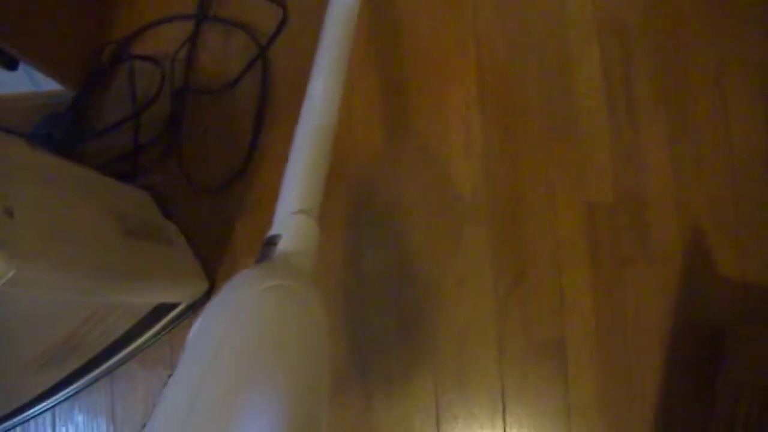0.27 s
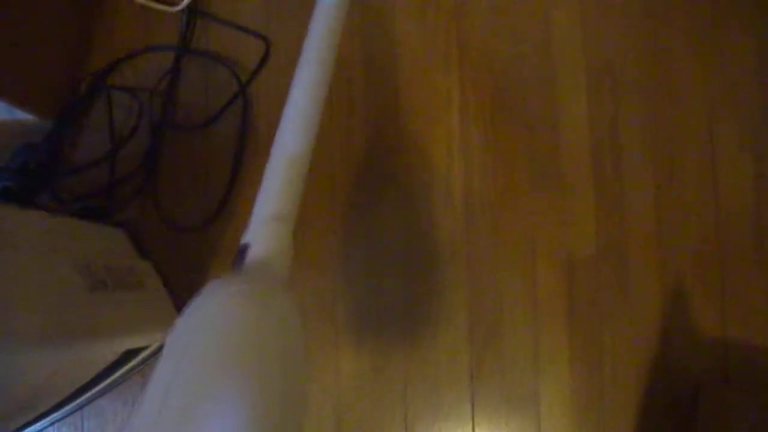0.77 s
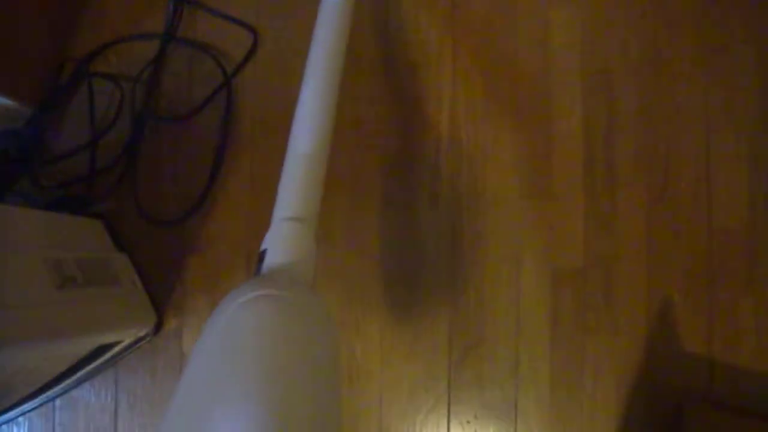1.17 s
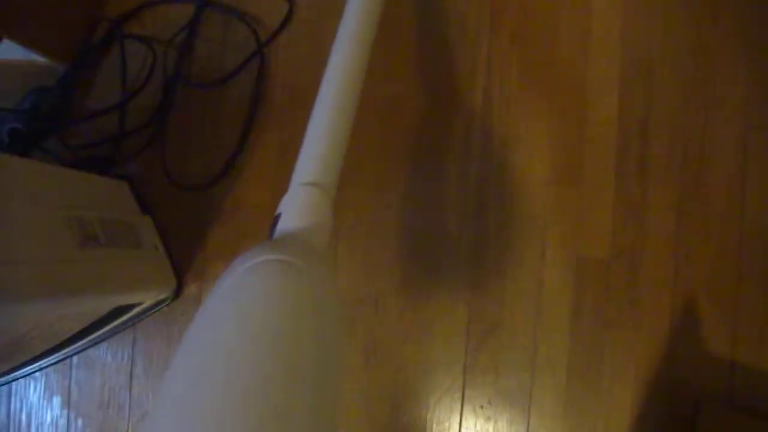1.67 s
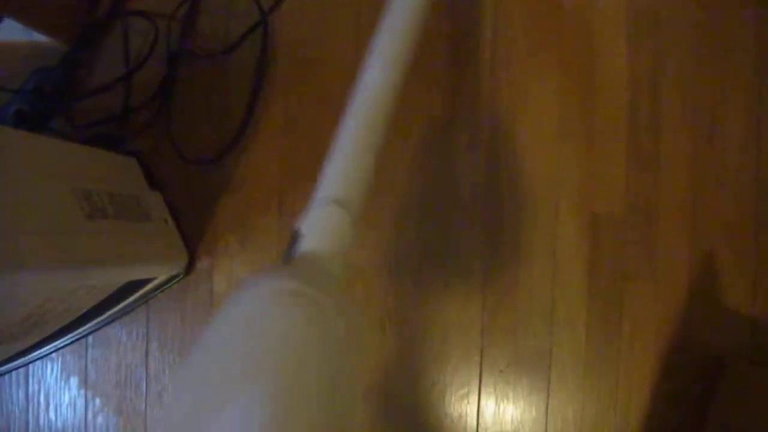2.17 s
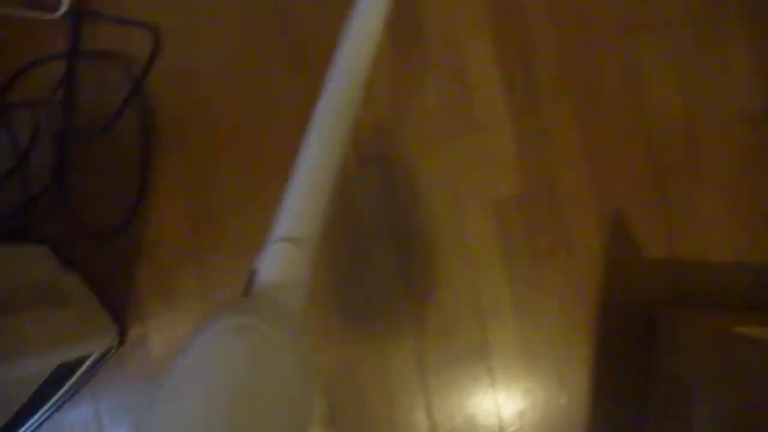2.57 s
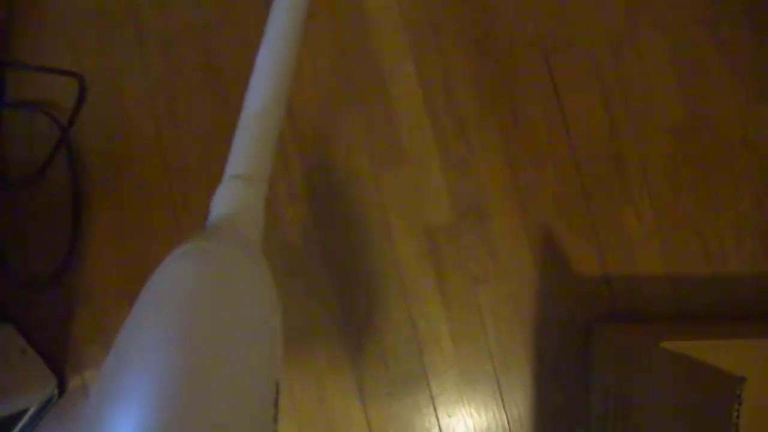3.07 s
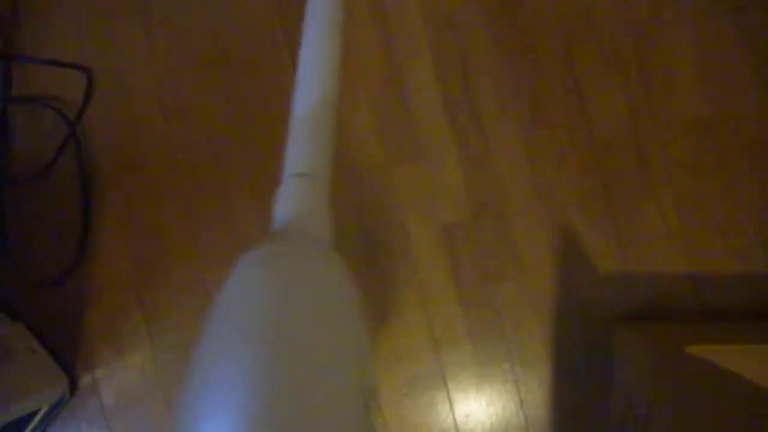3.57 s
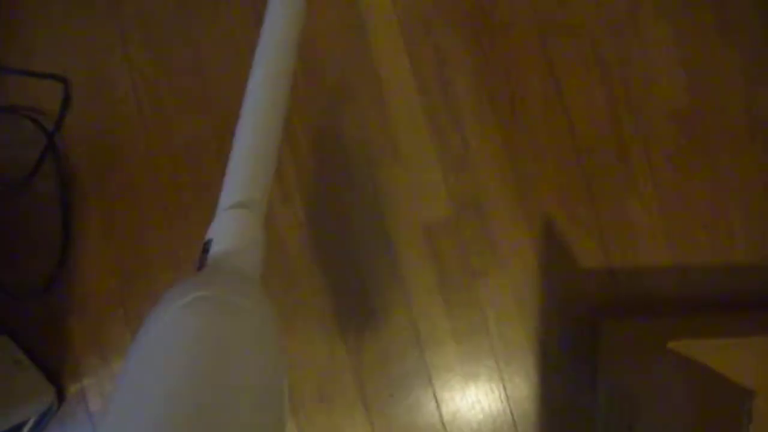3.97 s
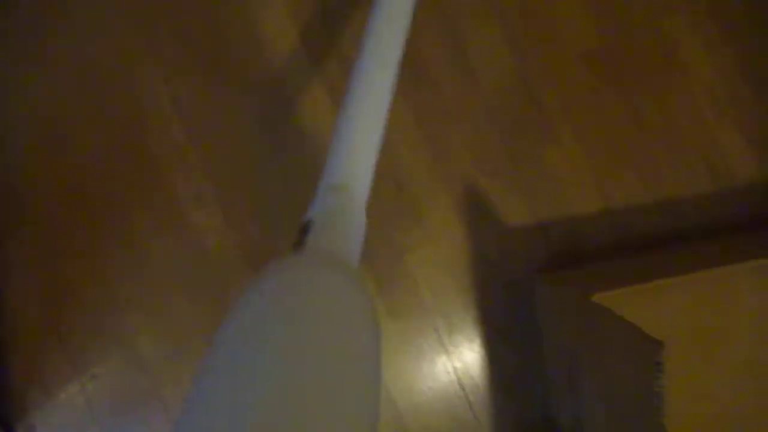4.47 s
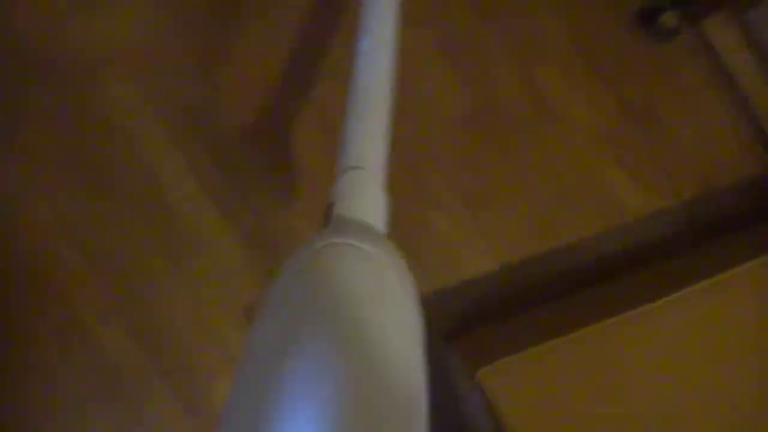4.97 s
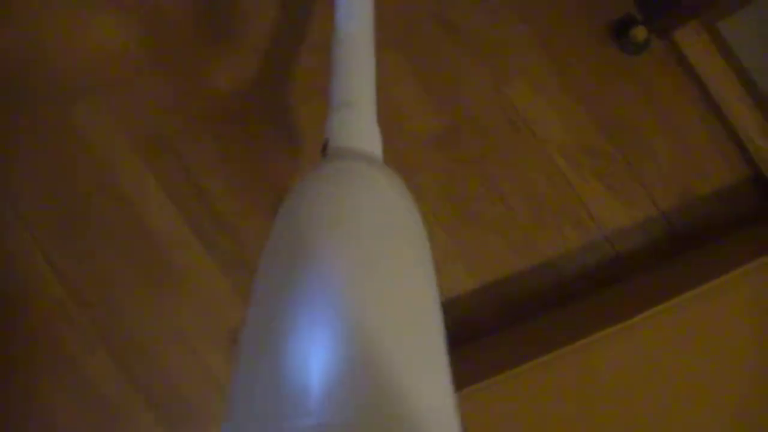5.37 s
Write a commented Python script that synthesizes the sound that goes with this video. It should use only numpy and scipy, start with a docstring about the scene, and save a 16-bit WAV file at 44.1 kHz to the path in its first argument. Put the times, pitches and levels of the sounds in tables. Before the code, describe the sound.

A cordless stick vacuum, close and centred, is heard in a quiet wooden-floored room with short reflections. From 0 s it runs at full speed: low hum near 280 Hz, piercing whine around 2.5 kHz with a fainter octave, and a broad, hollow rush with bright exhaust hiss. A short hollow scrape skims the floor at 0.25-0.5 s. At 1.5 s the trigger is released; pitch and air sink smoothly, leaving a thin bearing sizzle and flickering rotor tones, with plastic knocks and ticks at 2.15-2.55 s. A sharp clack at 2.87 s brings a fast spin-up, this burst carrying an extra bright, half-whistling hiss around 6 kHz. Released at 3.6 s, it glides down again as the hiss opens away by 3.9 s; clacks, a dull bump at 4.17 s, low grip rubbing and a faint pipe-like hoot follow. At 4.85 s it clicks, surges back and runs until about 5.6 s.

```python
"""Cordless stick vacuum in bursts

A stick vacuum, held close over a wooden floor in a quiet room, runs and coasts down; its trigger is pressed again twice.
Shaft speed steers a hum, the whine of a nine-blade impeller (sines) and a rush of air (noise ringing in wand and bin).
In the middle burst the intake is narrowed and hisses: a bright band of noise.
The plastic body clacks, ticks and bumps in the hand: shaped noise under struck envelopes."""
import sys
import numpy as np
from scipy import signal
from scipy.fft import rfft, irfft
from scipy.io import wavfile

SR = 44100
rng = np.random.default_rng(int(sys.argv[2]) if len(sys.argv) > 2 else 0)


def store_wav(level_fs):
    """Save 16-bit WAV to argv[1]."""
    pcm = np.round(np.clip(np.atleast_2d(level_fs), -1, 1) * 32767)
    wavfile.write(sys.argv[1], SR, pcm.T.astype(np.int16))


N = 248283
TIME = np.arange(N) / SR
FREQS = np.maximum(np.fft.rfftfreq(2 ** 18, 1 / SR), 1)  # Hz, kept off zero for logs and ratios


def from_db(db):
    """Decibels to amplitude."""
    return 10 ** (np.asarray(db) / 20)


def rms_one(x):
    """Scale a signal to rms 1."""
    return x / np.sqrt(np.mean(x ** 2) + 1e-20)


def in_time(rows):
    """Each column of a table as a curve over time."""
    s, *columns = np.transpose(rows)
    return [np.interp(TIME, s, column) for column in columns]


def bell(hz, width_hz):
    """Response curve of one resonance, 1 on top."""
    return 1 / (1 + (2 * (FREQS - hz) / width_hz) ** 2)


def filtered(x, response):
    """A signal through a frequency response."""
    padded_length = 2 * (len(FREQS) - 1)
    return irfft(rfft(x, padded_length) * response)[:N]


def noise(response):
    """Noise with a given frequency response; rms 1."""
    return rms_one(filtered(rng.standard_normal(N), response))


def colour(spectrum, resonances=()):
    """A smooth spectrum with resonances standing on it, falling away below its first point."""
    hz, db = np.transpose(spectrum)
    smooth_db = np.interp(np.log(FREQS), np.log(hz), db, left=db[0])
    peaks_db = sum(top_db * bell(f, width_hz) for f, width_hz, top_db in resonances)
    low_rolloff = np.minimum(FREQS / hz[0], 1) ** 2
    return low_rolloff * from_db(smooth_db + peaks_db)


def drift(rate_hz):
    """Slow random wander with spread 1."""
    return noise(1 / (1 + (FREQS / rate_hz) ** 2))


def strike(s, t60):
    """Envelope of a blow: a sudden rise and an exponential fall by 60 dB in t60 seconds."""
    age = np.maximum(TIME - s, 0)
    rise = 1 - np.exp(-age / 0.00042)
    return rise * from_db(-60 * np.minimum(age / t60, 3))


def room(x, wet_db, t60, count=40):
    """Floor, walls and furniture return scattered echoes that ripple the spectrum."""
    delays = rng.uniform(.002, .07, count)  # s
    echoes = np.zeros(N)
    echoes[(delays * SR).astype(int)] = rng.choice([-1, 1], count) * from_db(-60 * delays / t60)
    echoes *= from_db(wet_db) / np.linalg.norm(echoes)
    echoes[0] = 1  # direct sound
    echoes /= np.linalg.norm(echoes)
    return filtered(x, rfft(echoes, 2 * (len(FREQS) - 1)))


def shaft_speed():
    """Turns per second: powered, it closes in on full speed; released, it coasts against friction and air drag."""
    # full speed under power wanders a little with the load: t/s, shaft speed/(turns per s)
    full_speed = [(0.58, 279.5), (1.0, 281.7), (3.4, 281.7), (5.3, 278.8)]
    # the trigger, held at first: t/s, state (1 pressed, 0 released)
    trigger = [(1.492, 0), (2.854, 1), (3.619, 0), (4.851, 1)]
    spin_up_s, friction_s = .127, 2.969  # time constants
    drag_equal_hz = 184.2  # here air drag equals bearing friction
    full, = in_time(full_speed)
    speed = full.copy()
    for s, pressed in trigger:
        i = int(s * SR)
        age, start = TIME[i:] - s, speed[i]
        if pressed:
            speed[i:] = full[i:] + (start - full[i]) * np.exp(-age / spin_up_s)
        else:
            slowing = (1 / start + 1 / drag_equal_hz) * np.exp(age / friction_s)
            speed[i:] = 1 / (slowing - 1 / drag_equal_hz)
    return speed


def at_speed(speed, rated_db, growth_db, rated_hz=280):
    """Level of a sound that grows as a power of shaft speed: growth_db per tenfold speed."""
    return rated_db + growth_db * np.log10(speed / rated_hz)


def motor(speed, rush_db, jitter=0.0005, overtones_db=-2):
    """Imbalance hums once a turn, nine blades whine, and the rotor adds faint harmonics."""
    # the tones swell and fade as the machine moves through the room: t/s, gain/dB
    hum_swell = [(0.08, -6.5), (.36, 3), (.76, 4.5), (.97, -1.5), (1.46, -2), (1.62, -10), (1.98, 3.5),
                 (2.25, -5), (3.05, -3), (3.25, 1.5), (3.6, -3.5), (3.9, 6), (4.6, -3), (5.05, 8),
                 (5.63, 0)]
    whine_swell = [(0, 6), (.2, -0.5), (.5, -5), (.72, 2.5), (1.0, -7), (1.34, 1), (1.56, 1.5), (1.65, 0),
                   (2.9, -5), (3.27, 6.5), (3.39, -7.5), (3.72, 1), (4.95, -2.5), (5.12, 5), (5.2, 1),
                   (5.42, 4), (5.63, -2)]
    octave_swell = [(0, -5), (.32, 8), (.66, -5), (.87, 8), (1.3, -8), (1.56, 1), (1.8, -6), (3.2, 0),
                    (4.9, -1), (5.1, 4), (5.4, -3), (5.63, 9)]
    # weaker shaft harmonics: multiple of shaft speed, relative level/dB
    overtones = [(2, -30), (3, -34), (4, -34), (17, -32), (23, -29), (27, -23), (36, -34), (52, -25),
                 (54, -26), (63, -21), (72, -21)]
    blade_count = 9
    # the housing muffles the whine below an edge
    edge_hz, edge_width_hz, muffle_db = 2054, 72, 7.5
    muffled = .5 + .5 * np.tanh((edge_hz - blade_count * speed) / edge_width_hz)
    hum_db = at_speed(speed, -44.5, 71) + in_time(hum_swell)[0]
    whine_db = at_speed(speed, -33, 61) + in_time(whine_swell)[0] - muffle_db * muffled
    octave_db = at_speed(speed, -41.5, 93) + in_time(octave_swell)[0]
    turn = 2 * np.pi * np.cumsum(speed * (1 + jitter * drift(29))) / SR
    blades = blade_count * turn
    # while the speed changes the whine flickers more, like a tone beating against its own echoes
    gliding = np.minimum(np.abs(np.gradient(speed)) * SR / 150, 1)
    hum = from_db(hum_db + drift(5.8)) * np.sin(turn)
    whine = from_db(whine_db + (1.2 + 2.8 * gliding) * drift(38)) * np.sin(blades)
    octave = from_db(octave_db + (2.2 + 1.5 * gliding) * drift(20)) * np.sin(2 * blades)
    # rotor harmonics fade more slowly than the air, so they stand out while it coasts
    faint = sum(from_db(db + .6 * rush_db + 3.5 * drift(12)) * np.sin(multiple * turn)
                for multiple, db in overtones)
    housing = bell(550, 1100) + bell(5100, 1000) + .07 * bell(10500, 5000)
    rotor = from_db(overtones_db) * room(filtered(faint, housing), wet_db=-4, t60=0.28)
    return np.sqrt(2) * (hum + whine + octave + rotor)  # root 2 makes the sine levels rms


def air(rush_db, exhaust_db):
    """Turbulence rings in the wand and bin, hisses out of the vents and buffets the housing."""
    # noise spectra: f/Hz, relative level/dB
    rush_spectrum = [(170, -28.5), (260, -2), (370, -5.5), (480, -1.5), (1250, -4.5), (2400, 0),
                     (2750, -9.5), (4000, -27.5)]
    exhaust_spectrum = [(1800, -9), (2800, -5), (3800, -1), (6200, 2), (7100, -2.5), (8600, -7.5),
                        (10000, -14.5), (11000, -23), (13500, -24.5), (15500, -37)]
    rumble_spectrum = [(130, -26), (190, -7), (240, 4.5), (480, -22.5)]
    # air resonances of wand and bin: f/Hz, width/Hz, height/dB
    cavities = [(492, 68, 5), (806, 62, 7.5), (1048, 124, 6), (1234, 30, 3.5), (1490, 117, 6.5),
                (1860, 62, 2.5), (2190, 77, 2.5), (744, 13, 2.5)]
    # buffeting of the housing: t/s, level relative to the rush/dB
    buffet = [(.5, -29), (.56, -12), (1.5, -10), (2.7, -19), (3.3, -10.5), (3.9, -12.5), (4.3, -6.5),
              (5.2, -15.5)]
    # the wand hoots as a pipe: t/s, relative level/dB
    hoot = [(3.3, -66), (3.6, -53), (3.95, -43.5), (4.25, -36.5), (4.7, -49.5), (5.3, -36.5)]
    gust = drift(11)
    rush = from_db(rush_db + 0.9 + .5 * gust) * noise(colour(rush_spectrum, cavities))
    exhaust = from_db(exhaust_db + 1.04 * gust) * noise(colour(exhaust_spectrum))
    rumble = from_db(rush_db + in_time(buffet)[0] + drift(12)) * noise(colour(rumble_spectrum))
    # the wand's upper pipe mode rises and falls with the flow, up to a ceiling
    overblown = from_db(np.minimum(0.91 * (rush_db + 33.0), 3))
    pipe = noise(bell(547.6, 24)) + overblown * noise(bell(791.5, 45))
    return rush + exhaust + rumble + from_db(in_time(hoot)[0] - 4.5) * pipe


def bearings(level_db=-48, hz=6430, width_hz=550):
    """The bearings sing thinly throughout: a narrow band of noise with a wavering level."""
    return from_db(level_db + 3.2 * drift(9.4)) * noise(bell(hz, width_hz))


def room_tone(level_db=-55.0):
    """The quiet room is a steady bed of shaped noise."""
    # room spectrum: f/Hz, relative level/dB
    quiet_spectrum = [(25, -7), (130, 0), (500, 0.5), (2000, -26), (9000, -1.5), (15500, -12.5)]
    return from_db(level_db) * noise(colour(quiet_spectrum))


def scuff(reference_db=-42, hz=1550, width_hz=350):
    """The nozzle skims the floor with a brief hollow scrape."""
    contact = np.interp(TIME, [.25, .35, .45, .5], [0.09, 1.3, 2.8, 0.023])  # gain
    return contact * from_db(reference_db + 2 * drift(30)) * noise(bell(hz, width_hz))


def handling(tail_db=-19, tail_t60=0.092):
    """Each knock sets the plastic shell ringing and dies away in the room; the hand adds dull bumps."""
    # plastic knocks and ticks: t/s, level/dB, t60/s, relative level of the body below 3 kHz/dB
    knock_rows = [(2.155, -26, 0.083, -8), (2.23, -29, 0.035, -3), (2.268, -32, .04, -1),
                  (2.443, -35, 0.036, -10), (2.468, -33, 0.02, -15), (2.543, -30, 0.031, -7),
                  (2.854, -28.5, 0.047, -7), (2.869, -19.5, 0.18, 5), (3.926, -27.5, 0.071, -14),
                  (4.168, -30.5, 0.1, -5), (4.393, -31, 0.049, -11), (4.439, -32.5, 0.1, -16),
                  (4.606, -36, .04, 4), (4.623, -38, 0.11, -4), (4.701, -34.5, 0.14, -2),
                  (4.85, -30.5, 0.074, 3.5), (4.868, -33, 0.11, -6)]
    # dull bumps of the hand on the grip: t/s, level/dB, t60/s
    bump_rows = [(.53, -41, 0.18), (2.233, -37.5, 0.12), (2.868, -41, 0.2), (4.165, -31, 0.3),
                 (4.455, -42, 0.13), (4.615, -38.5, 0.19), (4.691, -42, 0.54), (4.825, -37, 0.053)]
    # noise spectra: f/Hz, relative level/dB
    knock_spectrum = [(120, -4), (400, 2.5), (3000, 2.5), (4500, 1.5), (7000, 1), (9200, -7),
                      (11000, -16.5), (15500, -27)]
    bump_spectrum = [(60, -32), (120, -9), (400, 3.5), (800, -9), (1600, -33)]
    # ringing of the plastic body, in every knock: f/Hz, width/Hz, height/dB
    shell_modes = [(710, 120, 4), (1530, 97, 4), (5280, 440, 3), (6100, 1100, 6)]
    shell = colour(knock_spectrum, shell_modes)
    low = 1 / (1 + (FREQS / 3300) ** 4)
    crack, body = noise(shell * (1 - low)), noise(shell * low)
    knocks = np.zeros(N)
    for s, db, t60, body_db in knock_rows:
        envelope = strike(s, t60) + from_db(tail_db) * strike(s, tail_t60)
        knocks += from_db(db) * envelope * (crack + from_db(body_db - 10.5) * body)
    bumps = sum(from_db(db) * strike(s, t60) for s, db, t60 in bump_rows)
    return knocks + bumps * noise(colour(bump_spectrum))


def ticks(hz=9800, width_hz=6000):
    """Tiny hard contacts sound mostly in the treble."""
    # thin bright ticks: t/s, level/dB, t60/s
    tick_rows = [(2.548, -49, 0.055), (2.763, -42, .07), (4.552, -41, .05), (4.854, -48, .08)]
    envelope = sum(from_db(db) * strike(s, t60) for s, db, t60 in tick_rows)
    return envelope * noise(bell(hz, width_hz))


def intake(speed, narrowed, pipe_db=-22, pipe_hz=1110, pipe_width_hz=110):
    """A narrow gap makes a bright jet that half whistles and rings the wand, until it opens again."""
    # jet spectrum: f/Hz, relative level/dB
    jet_spectrum = [(3000, -13.5), (4200, -8), (5300, -7.5), (5900, 1), (6500, -5), (7200, -7), (8000, -13),
                    (11500, -20.5), (15500, -29.5)]
    jet = from_db(at_speed(speed, -23, 59) + .5 * drift(25))
    wand = from_db(pipe_db) * noise(bell(pipe_hz, pipe_width_hz))
    return narrowed * jet * (noise(colour(jet_spectrum)) + wand)


def grip(level_db=-55, hz=135, width_hz=70, lowest_hz=90):
    """The hand shifts on the handle with a lumpy low rub."""
    shifting = np.interp(TIME, [3.97, 4.06, 4.85, 4.98], [0, 1, 1, 0])
    lumps = from_db(4 * drift(10))
    rub = noise(bell(hz, width_hz) / (1 + (lowest_hz / FREQS) ** 4))
    return shifting * lumps * from_db(level_db) * rub


def scene():
    """Shaft speed drives motor, air and intake; the whole machine sits straight ahead, alike in both ears."""
    # the air noise grows as the machine is held nearer: t/s, gain/dB
    nearness = [(0, 0), (.55, -0.4), (1.4, 0.54), (2.1, -0.5), (2.8, 0), (3.7, 0.5), (4.2, 0.1),
                (4.9, -0.5), (5.63, 1.5)]
    near_db, = in_time(nearness)
    speed = shaft_speed()
    # the intake narrows once, then opens again; the rush loses choke_db
    close_at_s, close_s, open_at_s, open_s = 2.88, 0.074, 3.736, 0.19
    choke_db = 2.5
    gap_times = [close_at_s, close_at_s + close_s, open_at_s, open_at_s + open_s]
    narrowed = np.interp(TIME, gap_times, [0, 1, 1, 0])
    rush_db = at_speed(speed, -32.5, 49) + near_db - choke_db * narrowed
    exhaust_db = at_speed(speed, -27, 61.5) + near_db
    running = air(rush_db, exhaust_db) + bearings() + intake(speed, narrowed)
    contacts = scuff() + handling() + ticks()
    mono = motor(speed, rush_db) + room(running, wet_db=-7.5, t60=0.3)
    mono += room(contacts, wet_db=-12.0, t60=0.26) + grip() + room_tone()
    return np.array([mono, mono])


def record(dry, notch_hz=7720, notch_width_hz=260, cutoff_hz=15750):
    """The microphone has one narrow notch, and the top is cut steeply."""
    notch_b, notch_a = signal.iirnotch(notch_hz, notch_hz / notch_width_hz, fs=SR)
    notched = signal.lfilter(notch_b, notch_a, dry)
    top_cut = signal.ellip(16, .1, 80, cutoff_hz, fs=SR, output="sos")
    return signal.sosfilt(top_cut, notched)


dry = scene()
out = record(dry)
store_wav(out)
```